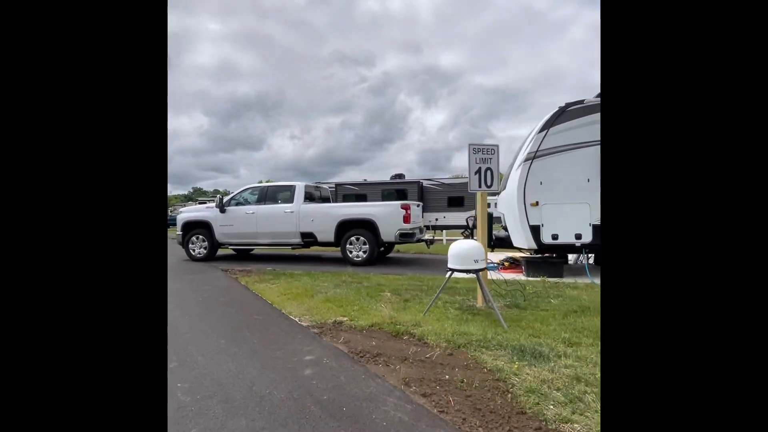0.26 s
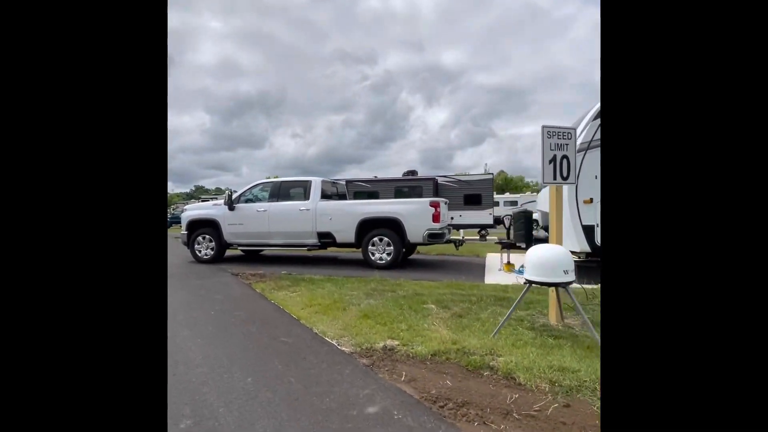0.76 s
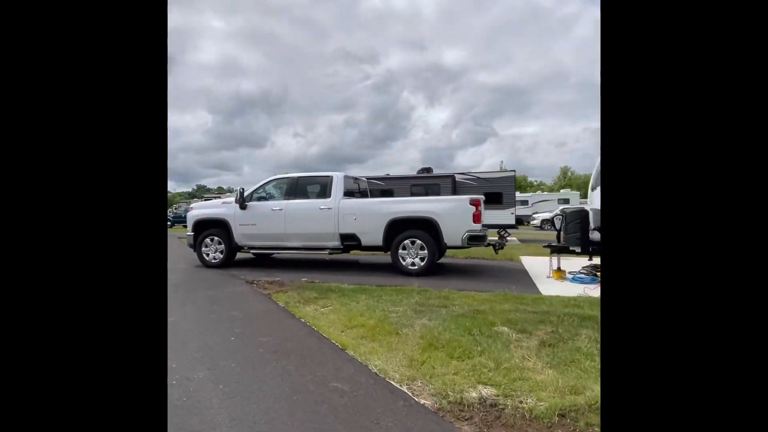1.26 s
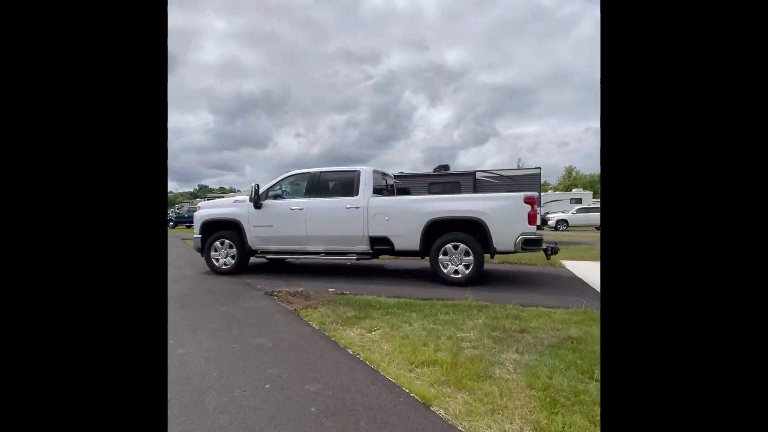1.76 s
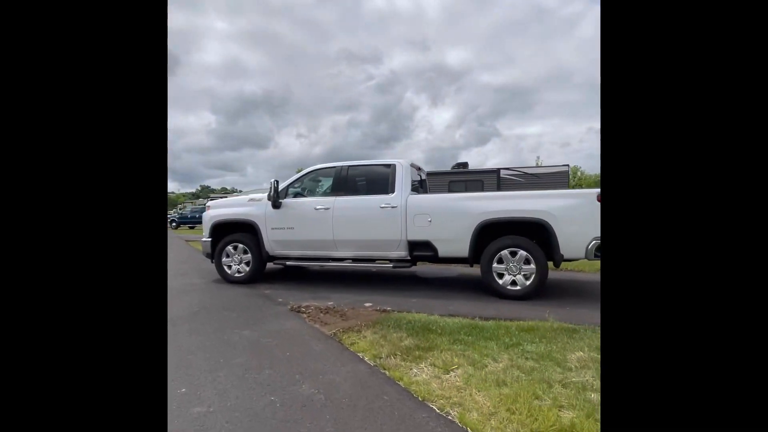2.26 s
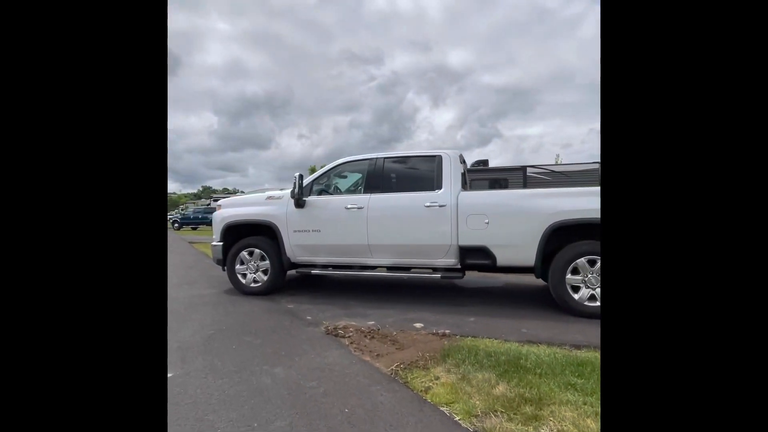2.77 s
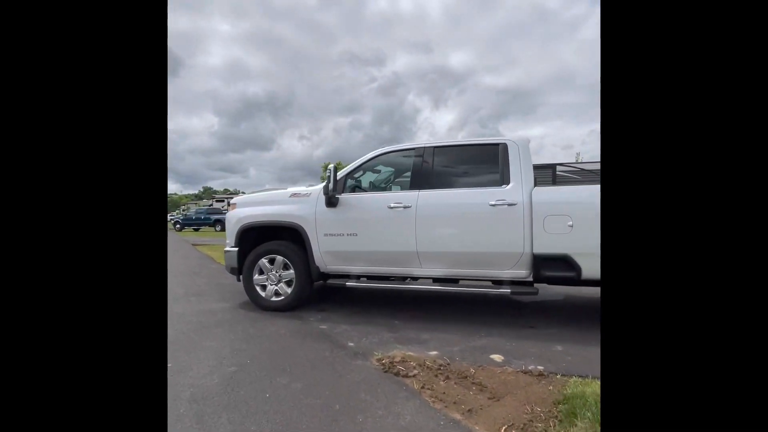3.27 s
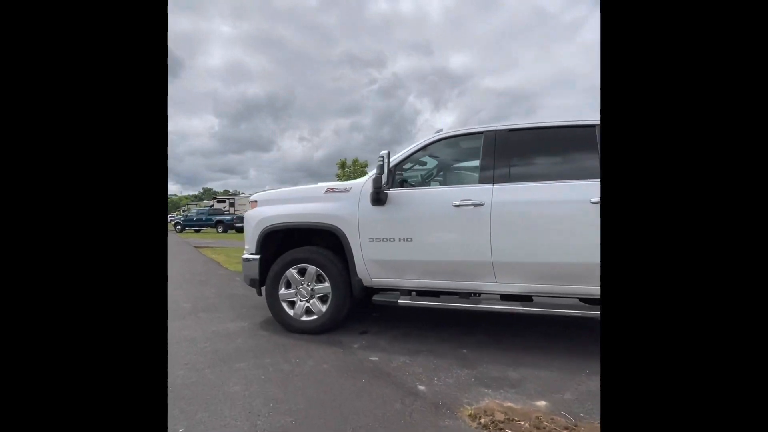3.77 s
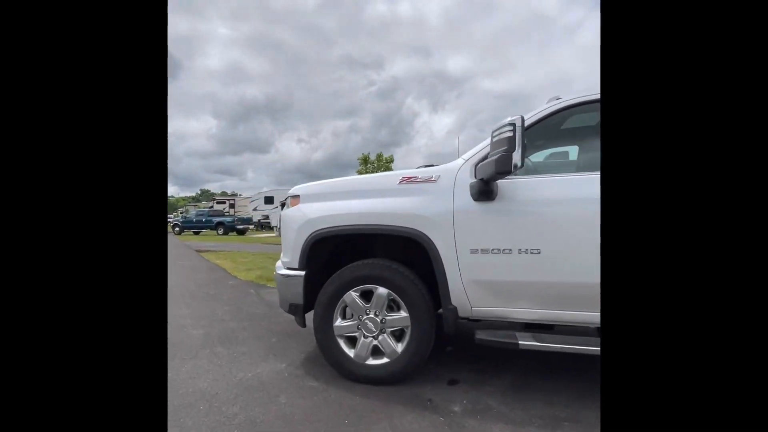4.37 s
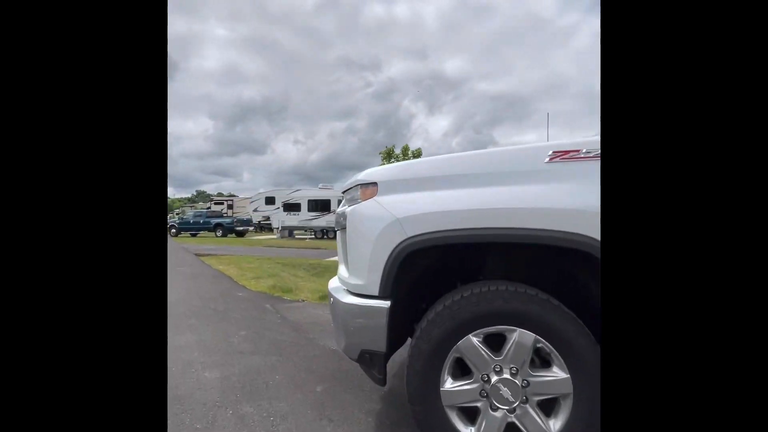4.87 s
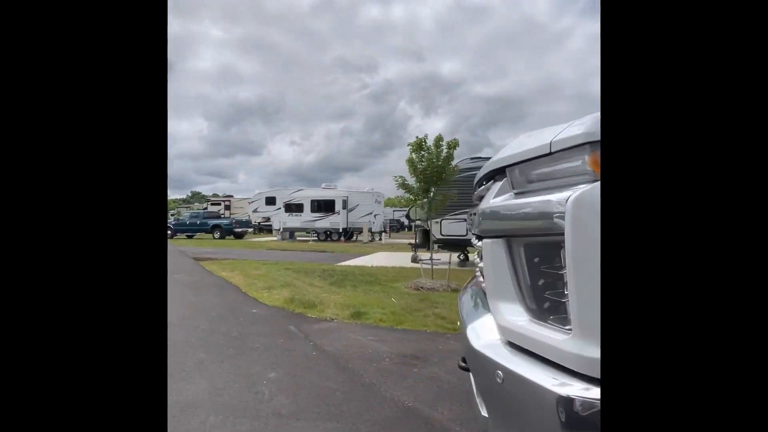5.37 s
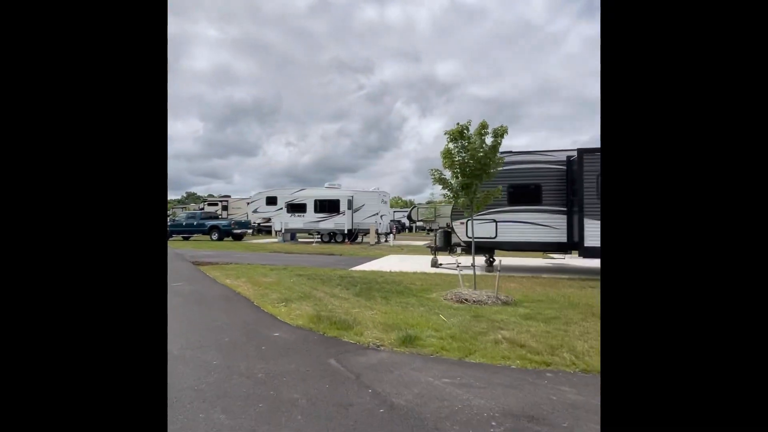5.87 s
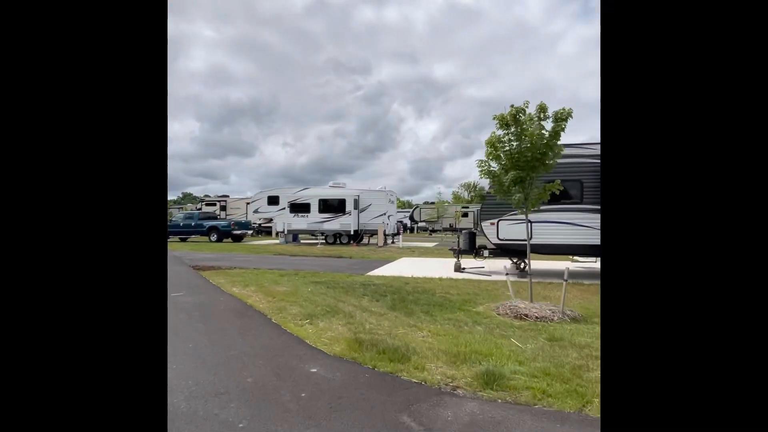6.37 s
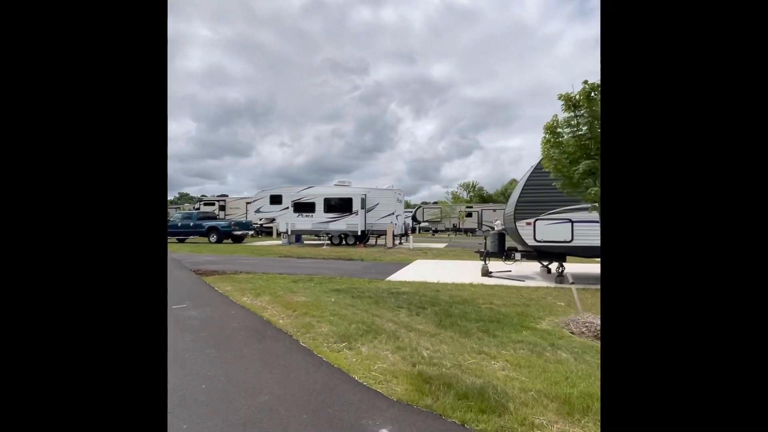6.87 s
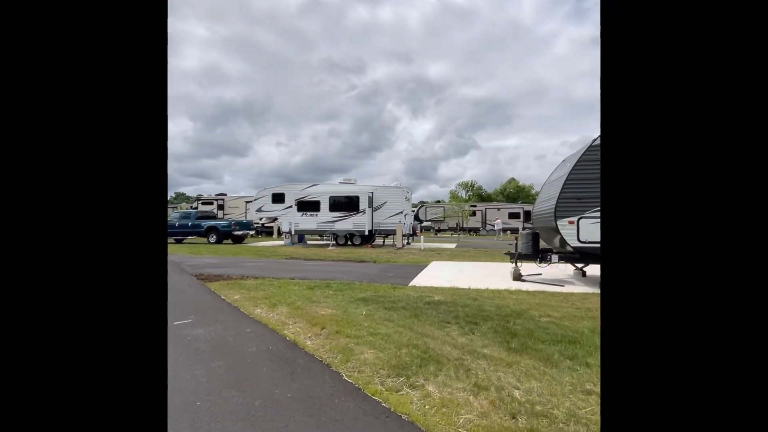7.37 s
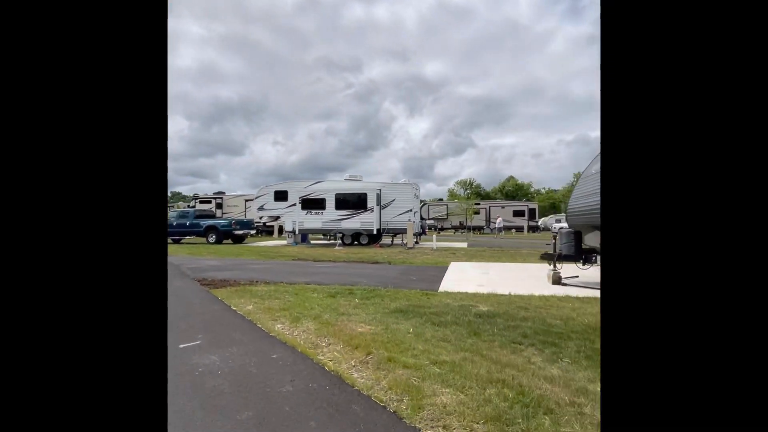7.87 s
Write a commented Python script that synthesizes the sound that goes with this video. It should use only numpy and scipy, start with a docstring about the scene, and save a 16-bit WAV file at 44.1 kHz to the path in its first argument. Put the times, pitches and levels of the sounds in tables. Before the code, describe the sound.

A continuous low engine putter, about twenty beats a second, with muffled rushing noise and deep wheel hum. A thin high whistle slips by early; the engine relaxes, rises again as sound bounces off a parked vehicle, loose parts tick, and a lower whistle slides past. Then it becomes slower and duller, lifting slightly at the end. Stereo microphone on the seat, open air.

```python
"""On a paved road, a stereo microphone on the seat of a golf cart with a small one-cylinder engine, rolling slowly.
A parked vehicle close by throws the sound back at first; the exhaust throb, multiples of the firing rate shaped
by the muffler, swells and sags. Noise through ringing body panels makes the roar of engine, belt and tyres.
A fuzzy whistle passes near 1 s. From 4 s the throb swells again, loose parts knock, the reflections return and
a lower whistle slides by; the engine slows, the wheel hums fade, and it picks up a little over a faint belt hum."""
import sys
import numpy as np
from scipy import signal
from scipy.fft import rfft, irfft, next_fast_len
from scipy.io import wavfile
from scipy.ndimage import uniform_filter1d, map_coordinates

SR = 44100
rng = np.random.default_rng(int(sys.argv[2]) if len(sys.argv) > 2 else 0)


def to_wav(sig):
    """Store sig (one row per channel, or 1-D mono) as 16-bit WAV at the path in sys.argv[1].

    Samples outside -1..1 are clipped; the rate is SR.
    """
    pcm = np.clip(np.atleast_2d(sig), -1, 1) * 32767
    pcm = np.round(pcm).astype(np.int16)
    wavfile.write(sys.argv[1], SR, pcm.T)  # frames by channels


N = 357695  # samples, 8.11 s
CRUISE_PER_S = 19  # firings per second at which the speed-dependent levels are stated
FRAME, HOP = 2048, 256  # samples, for the spectrum of the roar


def gain_of(db):
    """Decibels to amplitude."""
    return 10 ** (np.asarray(db) / 20)


def evened(x):
    """Scales to rms 1."""
    return x / np.sqrt(np.mean(abs(x) ** 2) + 1e-20)


def over_hz(points, hz):
    """Columns of a table, read along a logarithmic frequency axis."""
    f, *columns = np.transpose(points)
    return [np.interp(np.log(hz + 1), np.log(f + 1), c)[:, None] for c in columns]


def over_time(rows, t):
    """Columns of a table, read at the times t."""
    s, *columns = np.transpose(rows)
    return [np.interp(t, s, c) for c in columns]


def wander(hz):
    """Smooth chance of rms 1 that changes about hz times a second."""
    noise = rng.standard_normal(N + SR)
    lowpass = signal.butter(2, hz, fs=SR, output="sos")
    return evened(signal.sosfilt(lowpass, noise)[SR:])  # the first second lets the filter settle


# Engine speed, evenly spaced points on a smooth curve: time_s, firings_per_s
ENGINE_SPEED = [(0.0, 19.85), (0.5, 21.44), (1.0, 22.46), (1.5, 21.62), (2.0, 19.73), (2.5, 18.37),
                (3.0, 17.62), (3.5, 17.69), (4.0, 18.73), (4.5, 20.26), (5.0, 20.24), (5.5, 18.77),
                (6.0, 17.30), (6.5, 15.96), (7.0, 15.69), (7.5, 16.50), (8.0, 17.12), (8.5, 17.54)]


def speed():
    """Firings per second, sample by sample, on a spline through the points."""
    spacing_s = ENGINE_SPEED[1][0]
    position = np.arange(N) / SR / spacing_s
    return map_coordinates(np.transpose(ENGINE_SPEED)[1], [position], order=3, mode="nearest")


def firing_angle():
    """Phase of the engine cycle, one turn a firing."""
    return 2 * np.pi * np.cumsum(speed()) / SR


# Rise of rumble, drone, roar, hiss and air for each firing per s above cruise: gain_db
SPEED_GAIN = [0.73, 1.82, 0.98, 1.1, 0.88]
# Rise of the same five with nearness 1 to a reflector: gain_db
REFLECTED_GAIN = [2.7, 0.53, 1.9, 5.3, 3.8]
# Parked vehicles beside the cart that throw the sound back: time_s, nearness (0 none, about 1 close)
PARKED_NEARNESS = [(0, 0.95), (.5, 0.81), (1.1, 0), (1.6, 0), (2, 0), (2.7, 0), (3.9, 0.4), (4.3, 1),
                   (5.3, 0.5), (5.62, 0.6), (5.78, 1.17), (5.95, 1.1), (6.05, 0.7), (7, 0.1), (8.11, 0)]


def swells():
    """Level dB of rumble, drone, roar, hiss and air: they rise with speed and near a reflector."""
    near = over_time(PARKED_NEARNESS, np.arange(N) / SR)[0]
    return np.outer(SPEED_GAIN, speed() - CRUISE_PER_S) + np.outer(REFLECTED_GAIN, near)


# Level of the top treble: time_s, level_db
TOP_TREBLE = [(0, -1), (.4, 3), (1.1, 0), (2.3, -0.5), (2.55, -5.5), (3.8, -4), (4.3, 3), (4.9, 4.5),
              (5.15, 1.5), (5.35, 9.5), (5.55, 3), (5.9, 1), (6.05, -5.5), (8.11, -5.5)]
# Level of three bands of the roar, one column for each row below: time_s, low_db, middle_db, high_db
BAND_LEVELS = [(0, 1.5, 4, -1.5), (.7, -0.5, -1, 0.5), (1.5, 0.5, 0.5, 2.5), (2.3, 1.5, 0, -1),
               (3.4, 1, 2.5, -1), (4.2, -0.5, -0.5, -2.5), (5.201, -0.5, -2, -1), (6.2, 2, 0, -2),
               (7, 0, 0.5, -0.5), (8.11, -2.5, 2.5, -2)]
# Place of those bands: centre_hz, half_width_hz
BAND_PLACES = [(280, 100), (550, 130), (3200, 700)]


def roar_level_db(hz, at):
    """Slow level changes of the roar and its treble flicker, for each frequency (rows) and frame (columns)."""
    rumble_db, drone_db, roar_db, hiss_db, air_db = swells()[:, at]
    top_db = over_time(TOP_TREBLE, at / SR)[0]
    # each weight is 1 below its edge and falls to 0 above it; neighbours differ by one band
    edges = ((140, 4), (600, 4), (2600, 4), (6800, 8), (11000, 30))  # (edge Hz, steepness)
    bass, low, middle, upper, high = (1 / (1 + (hz / edge_hz) ** steep) for edge_hz, steep in edges)
    level_db = bass * rumble_db + (low - bass) * drone_db + (middle - low) * roar_db
    level_db = level_db + (upper - middle) * hiss_db + (high - upper) * air_db + (1 - high) * top_db
    level_db = level_db + 0.5 * (1 - middle) * wander(hz=15)[at]  # the treble flickers
    for band_db, (centre_hz, half_width_hz) in zip(over_time(BAND_LEVELS, at / SR), BAND_PLACES):
        level_db = level_db + band_db / (1 + ((hz - centre_hz) / half_width_hz) ** 4)
    return level_db


# Body panels that the roar sets ringing, and gaps between them (negative), before the ring factors:
# pitch_hz, width_hz, common_db, opposite_db
BODY_PANELS = [(238.3, 19, 4, -1.5), (527, 30, 5, 6), (813, 125, 5, 3.5), (906, 60, 4.5, 1.5),
               (988, 19, -3.5, 5), (1071.5, 45, 8, -0.5), (1370, 47, -3, -5.5), (1455, 25, 3, 1),
               (1522, 60, 4.5, 4), (1586, 42, 8.5, 5), (1643, 37, -3.5, -10), (1690, 40, 5, 0),
               (1770, 60, -5.5, 0.5), (1850, 60, 4.5, 0), (2053, 52, 8, 1.5), (2210, 26, 5.5, 1.5),
               (2823, 120, -5, -1), (2900, 110, 2.5, 4), (3190, 20, -4, 1), (3150, 37, 1.5, 1),
               (3490, 53, 3, 2), (3530, 40, -2, 8), (3765, 60, 2.5, -1)]
# Ring factor of panels under 1300 Hz, up to 2500 Hz, above: factor_at_cruise, change_per_firing_per_s
RING_FACTORS = [(1.21, -0.062), (1.034, -0.11), (2.24, 0.021)]
# Further factor on the ringing between 1300 and 2500 Hz: time_s, factor
MIDDLE_RINGING = [(0, 1.1), (1.8, 1.2), (2.2, 1.1), (2.7, 1), (3.3, 1.42), (4.2, 1.1), (5.4, 1.37),
                  (5.7, 0.97), (6.8, 0.63), (7.2, 1.16), (8.11, 1.2)]


def panels_db(hz, at):
    """Resonances of the body, each wavering alone in strength and pitch, for common and opposite parts."""
    faster = speed()[at] - CRUISE_PER_S
    rings = [ring + change * faster for ring, change in RING_FACTORS]
    rings[1] = rings[1] * over_time(MIDDLE_RINGING, at / SR)[0]
    total_db = 0
    for pitch_hz, width_hz, common_db, opposite_db in BODY_PANELS:
        ring = rings[np.digitize(pitch_hz, [1300, 2500])]
        centre_hz = pitch_hz * (1 + 0.006 * wander(hz=2.1)[at])
        strength = ring + 0.14 * wander(hz=3.96)[at]
        shape = strength / (1 + (2 * (hz - centre_hz) / width_hz) ** 2)
        total_db = total_db + np.array([common_db, opposite_db])[:, None, None] * shape
    return total_db


# Pulsing of the roar by the firing knock and the valves, before chance varies the depth:
# from_hz, to_hz, once_a_cycle_db, loudest_at_turn, twice_a_cycle_db, loudest_at_turn
FIRING_PULSES = [(0, 700, .5, .75, .2, .0), (700, 1200, 1.1, .98, .9, .95), (1200, 1460, .3, .9, .4, .9),
                 (1460, 1660, 1.7, .6, .6, .45), (1660, 2300, .6, .7, 1.1, .95),
                 (2300, 4200, .2, .05, .8, .85), (4200, 20000, .5, .15, .3, .9)]


def pulsed(x):
    """Each band swells at its own moments of the engine cycle, unevenly from cycle to cycle."""
    size = next_fast_len(N)
    spectrum, hz = rfft(x, size), np.fft.rfftfreq(size, 1 / SR)
    angle = firing_angle()
    out = 0
    for low_hz, high_hz, once_db, once, twice_db, twice in FIRING_PULSES:
        cycle_db = once_db * np.cos(angle - 2 * np.pi * once)
        cycle_db = cycle_db + twice_db * np.cos(2 * (angle - 2 * np.pi * twice))
        band = irfft(spectrum * (hz >= low_hz) * (hz < high_hz), size)[:, :N]
        out = out + band * gain_of(cycle_db * (1 + .55 * wander(hz=12)))
    return out


# Low end of the common roar: pitch_hz, level_db (per Hz)
RUMBLE = [(20, -90), (35, -73), (50, -58.5), (70, -57), (95, -53.5), (140, -59), (210, -61)]
# Roar common to both microphone ports, before swells and panels: pitch_hz, level_db (per Hz)
COMMON_ROAR = RUMBLE + [(310, -58.5), (450, -66.0), (1350, -74.0), (2800, -80.0), (3800, -84.5),
               (5200, -91.5), (9500, -102), (10100, -135), (11700, -135), (12100, -105), (14300, -101),
               (15700, -104)]
# Roar of opposite sign at the two ports, likewise: pitch_hz, level_db (per Hz)
OPPOSITE_ROAR = [(40, -80), (200, -65), (520, -65), (900, -64.5), (1800, -72.5), (2500, -73), (3700, -87),
                 (4400, -86), (7000, -95.5), (11000, -99.5), (13200, -103), (14000, -135)]
# The ports lie a few centimetres apart, which ties the opposite part to the common one:
# pitch_hz, tied_share (0-1), lead_rad
PORT_TIE = [(100, .45, 3.2), (330, .6, 3.4), (600, .65, 1.5), (1000, .45, .3), (2300, .35, 1.2),
            (2600, .45, -1.6), (3400, .68, -1.6), (4800, .5, -1.4), (5200, .35, 1.9), (9800, .25, 2),
            (11500, .35, 4.7), (13500, .4, 4.7)]


def roar():
    """Engine, belt and tyres: noise shaped by the panels, pulsing faintly with each firing, at two ports."""
    frames = N // HOP + 9
    bins_hz = np.fft.rfftfreq(FRAME, 1 / SR)
    hz = bins_hz[:, None]
    at = np.minimum(np.arange(frames) * HOP, N - 1)  # sample at each frame
    a, b, c, d, patches = rng.standard_normal((frames, len(bins_hz), 5)).T
    # patches of level, about 200 Hz wide and 80 ms long
    patches = uniform_filter1d(patches, size=10, axis=0)
    patches = evened(uniform_filter1d(patches, size=14, axis=1))
    share, lead = over_hz(PORT_TIE, bins_hz)
    share = np.clip(share, 0, 1)
    common, untied = a + 1j * b, c + 1j * d
    opposite = share * np.exp(1j * lead) * common + np.sqrt(1 - share ** 2) * untied
    common_gain = gain_of(over_hz(COMMON_ROAR, bins_hz)[0])
    opposite_gain = gain_of(over_hz(OPPOSITE_ROAR, bins_hz)[0])
    spectra = np.array([common * common_gain, opposite * opposite_gain])
    spectra *= gain_of(roar_level_db(hz, at) + panels_db(hz, at) + 1.6 * patches)
    per_hz = np.sqrt(3 * SR / FRAME)  # makes the table levels hold per Hz
    mid, side = signal.istft(spectra, nperseg=FRAME, noverlap=FRAME - HOP)[1][:, :N] * per_hz
    return pulsed(np.array([mid + side, mid - side])) * gain_of(0.51 * wander(hz=19))


# Two hums of the wheels and axle that sink as the cart slows, one table each, before the waver:
# time_s, pitch_hz, level_db, octave_above_db
WHEEL_HUMS = [
    [(0, 51.2, -55, -39), (.8, 51.3, -57, -33), (1.5, 51.5, -62, -34), (1.9, 51.2, -62, -42),
     (2.6, 50.4, -62, -35), (3.2, 49.9, -65, -34), (3.9, 49.3, -49, -34), (4.3, 48.8, -44, -46),
     (5.3, 46.8, -43, -48), (5.75, 46.5, -45, -46), (6.2, 46.5, -55, -41), (6.7, 45, -65, -65)],
    [(0, 38, -65, -43), (.45, 37.8, -50, -35), (.8, 37.6, -44, -37), (1.5, 36.6, -43, -34),
     (2.2, 35.8, -58, -39), (2.7, 35.2, -80, -60), (3.6, 34.8, -80, -58), (3.95, 34.6, -68, -43),
     (4.6, 34, -60, -44), (5.35, 33.2, -66, -39), (5.75, 32.6, -70, -55), (6.3, 32, -80, -70)],
]
BELT_MULTIPLE = 5.63  # turns of the belt-driven part for each firing
BELT_DB, BELT_DB_PER_FIRING = -39, 1.3  # level at cruise before the waver, rise for each firing per s


def hums():
    """Low tones that waver together: the belt part, tied to engine speed, and the wheels with an octave."""
    t = np.arange(N) / SR
    belt_db = BELT_DB + BELT_DB_PER_FIRING * (speed() - CRUISE_PER_S)
    out = gain_of(belt_db) * np.cos(BELT_MULTIPLE * firing_angle())
    for rows in WHEEL_HUMS:
        hz, low_db, octave_db = over_time(rows, t)
        angle = 2 * np.pi * np.cumsum(hz) / SR
        out = out + gain_of(low_db) * np.cos(angle) + gain_of(octave_db) * np.cos(2 * angle)
    return np.sqrt(2) * out * gain_of(2.8 * wander(hz=3))


# Fuzzy sliding whistles, one table each, before fuzz and port factors: time_s, pitch_hz, level_db
SLIDING_WHISTLES = [
    [(4.7, 903, -42), (4.85, 941, -37), (5.0, 822, -42), (5.2, 790, -33), (5.4, 776, -56)],
    [(.62, 3760, -62), (.75, 3730, -54), (.9, 3700, -66), (1.1, 3720, -60), (1.22, 3760, -44.5),
     (1.36, 3680, -41), (1.45, 3650, -66)],
]


def whistle(rows):
    """A tone blurred by chance into a narrow band of noise that follows the sliding pitch."""
    t = np.arange(N) / SR
    hz, level_db = over_time(rows, t)
    angle = 2 * np.pi * np.cumsum(hz) / SR
    sounding = (t > rows[0][0]) & (t < rows[-1][0])
    fuzzy = (0.81 + wander(hz=6.8)) * np.cos(angle) + wander(hz=11) * np.sin(angle)
    return sounding * gain_of(level_db) * fuzzy


# Loose parts that knock, level before rise, decay and port factors: start_s, level_db, pitch_hz
LOOSE_PARTS = [(4.08, -33, 1570), (4.235, -34, 2030), (4.659, -27.5, 1204), (4.801, -31, 1030),
               (5.009, -33, 786), (6.243, -27, 1074), (6.307, -29, 1027), (6.838, -35, 826),
               (7.549, -28, 810)]
RATTLE_T60_S, RATTLE_RISE_S = 0.11, 0.0055


def rattles():
    """Each knock is a short dying ring, stronger at the first port."""
    t, out = np.arange(0, .15, 1 / SR), np.zeros(N)
    envelope = np.minimum(t / RATTLE_RISE_S, 1) * gain_of(-60 * t / RATTLE_T60_S)
    for start_s, level_db, pitch_hz in LOOSE_PARTS:
        part = out[round(start_s * SR):][:len(t)]
        part += envelope * gain_of(level_db) * np.sin(2 * np.pi * pitch_hz * t)
    return out * np.array([[1.4], [.6]])


# Throttle, and the 4th multiple that shakes the frame, before its waver:
# time_s, throttle_opening (0-1), fourth_multiple_db
ENGINE_LOAD = [(0.0, 0.58, -30), (0.25, 0.98, -20), (0.55, 0.89, -14), (1.0, 0.89, -14.0),
               (1.7, 0.24, -16.5), (2.3, 0.15, -23.5), (2.9, 0.25, -27), (3.6, 0.46, -28.5),
               (4.1, 0.65, -37.5), (4.45, 0.9, -25), (4.8, 0.53, -20), (5.4, 0.35, -22), (6.0, 0, -25.5),
               (6.6, 0.0, -26.5), (6.95, 0.12, -33), (7.3, 0.24, -34), (7.7, 0.37, -30), (8.11, 0.015, -27)]
# Shape of the firing pulse, before the muffler, by multiple: throttle_shut_db, gain_as_it_opens_db
PULSE_SHAPE = {2: (-2.6, 3), 3: (-11.5, 6.6), 5: (-11, 16.9), 6: (0.14, 3.4), 7: (-5.5, 10),
               8: (-3.5, 18.5), 9: (3.5, 0.84)}
# What the muffler passes of each multiple but the 4th: pitch_hz, level_db
MUFFLER_PASS = [(30, -47.5), (45, -40), (60, -24.5), (70, -29), (80, -18), (90, -20.5), (102, -22),
                (115, -30), (130, -37.5), (145, -43.5), (165, -42.5), (200, -49.5), (260, -48),
                (300, -59.5), (400, -54)]
# Phase shift by muffler and pipe, which shapes the throb: pitch_hz, lead_rad
MUFFLER_LEAD = [(60, 2.7), (78, 0), (97, .5), (130, 3.1), (160, 5.8), (200, 7.3), (400, 14)]
# Multiples whose phase shift holds at any speed, by multiple: lead_rad
SPEED_FREE_LEAD = {6: .4, 7: 1.2}


def exhaust():
    """Multiples of the firing rate through the muffler; no two firings are equally strong or timed."""
    hz = speed()
    throttle, frame_db = over_time(ENGINE_LOAD, np.arange(N) / SR)
    angle = firing_angle() + 0.015 * wander(hz=22.5)
    pulse_db = {k: shut_db + gain_db * throttle for k, (shut_db, gain_db) in PULSE_SHAPE.items()}
    drone_db = swells()[1]
    pulse_db.update(dict.fromkeys(range(10, 19), 3 + drone_db))  # 10th to 18th follow the drone
    level_db = {k: db + np.interp(k * hz, *np.transpose(MUFFLER_PASS)) for k, db in pulse_db.items()}
    level_db[4] = frame_db
    lead = {k: np.interp(k * hz, *np.transpose(MUFFLER_LEAD)) for k in level_db}
    lead[4] = -.08 * (4 * hz - 66)  # the frame lags as the speed rises
    lead.update(SPEED_FREE_LEAD)
    # high multiples hold their phase less well
    drift = {k: np.clip(.15 * (k - 6), .13, .7) * wander(hz=1.6) for k in lead}
    lines = 0
    for k, db in level_db.items():
        lines = lines + gain_of(db + 0.86 * wander(hz=4.5)) * np.cos(k * angle + lead[k] + drift[k])
    return np.sqrt(2) * lines * gain_of(0.38 * wander(hz=5.7))


def scene():
    """Exhaust and hums are near mono; the whistles reach the two ports with opposite sign."""
    near_mono = (exhaust() + hums()) * gain_of([[-.2], [.2]])
    whistles = sum(map(whistle, SLIDING_WHISTLES)) * np.array([[1.3], [-.6]])
    return near_mono + roar() + rattles() + whistles


def record(dry):
    """The recorder's band limit: a steep lowpass at 15.8 kHz."""
    lowpass = signal.firwin(511, 15800, window=("kaiser", 9), fs=SR)
    return signal.oaconvolve(dry, lowpass[None], "same")


dry = scene()
out = record(dry)
to_wav(out)
```